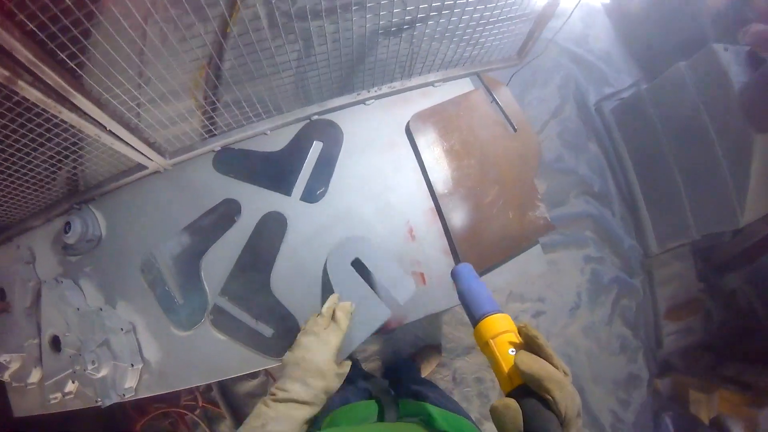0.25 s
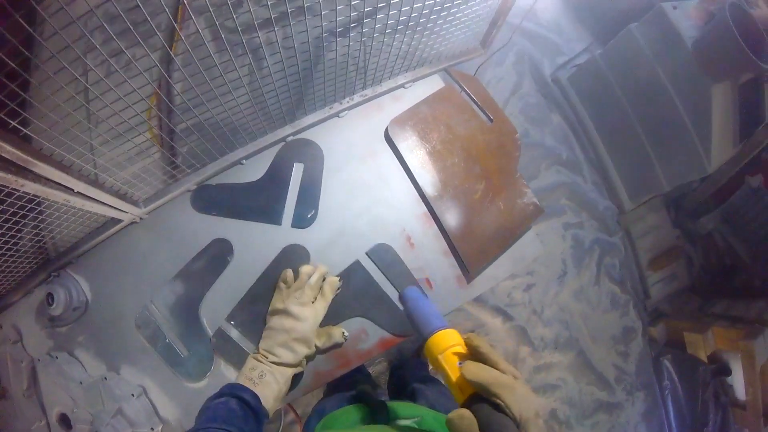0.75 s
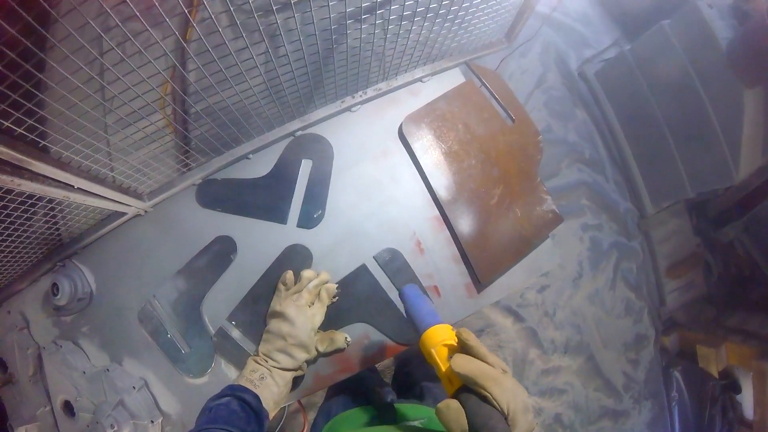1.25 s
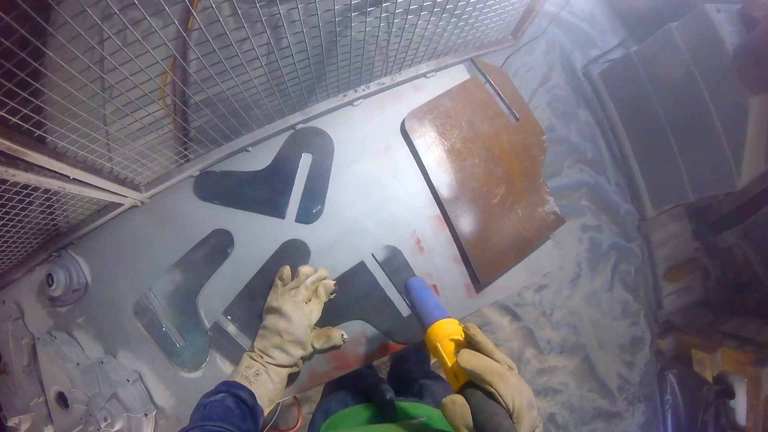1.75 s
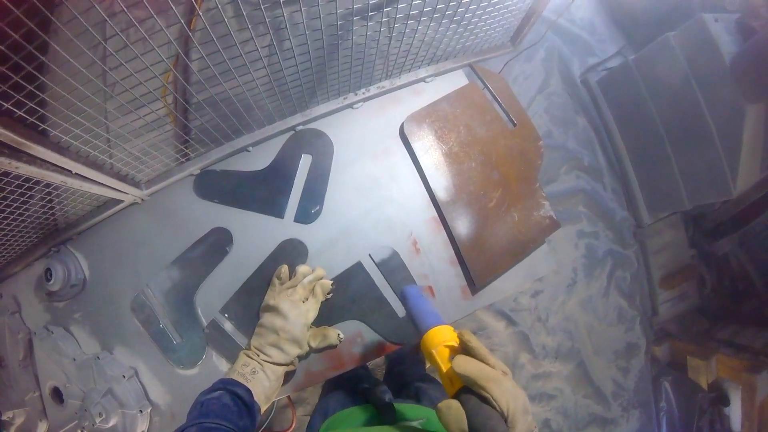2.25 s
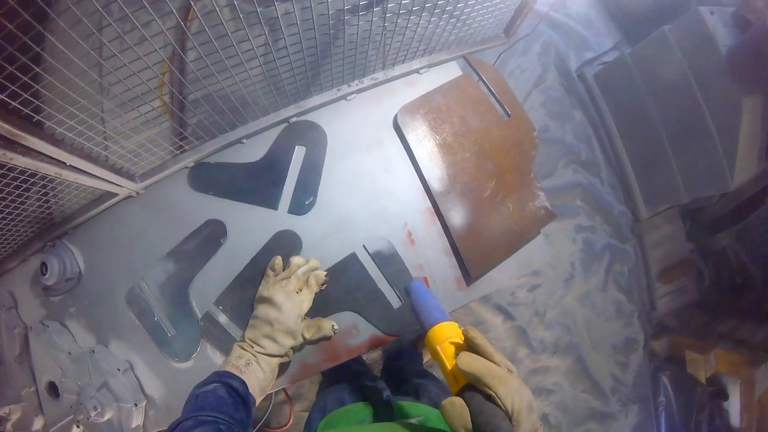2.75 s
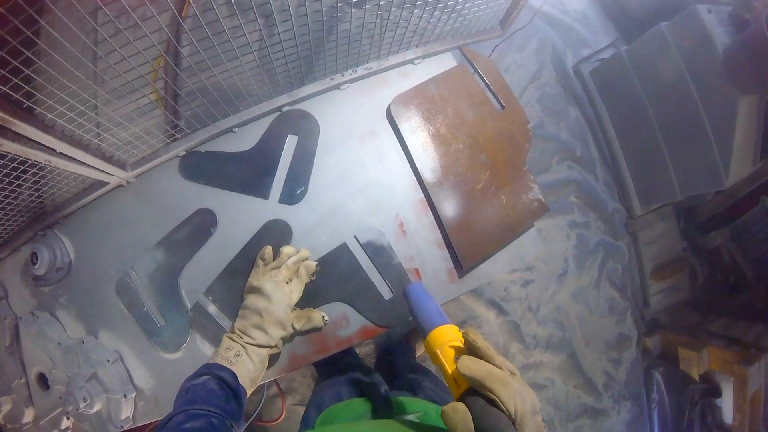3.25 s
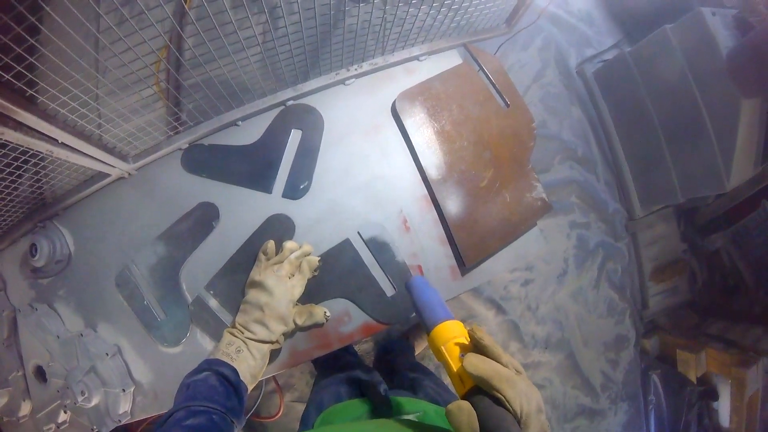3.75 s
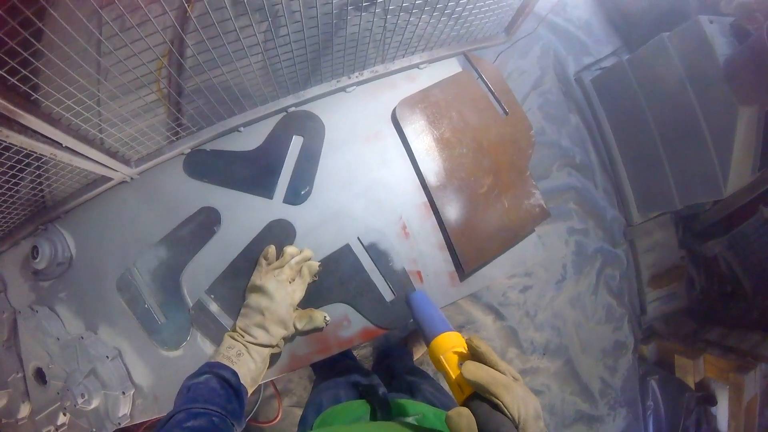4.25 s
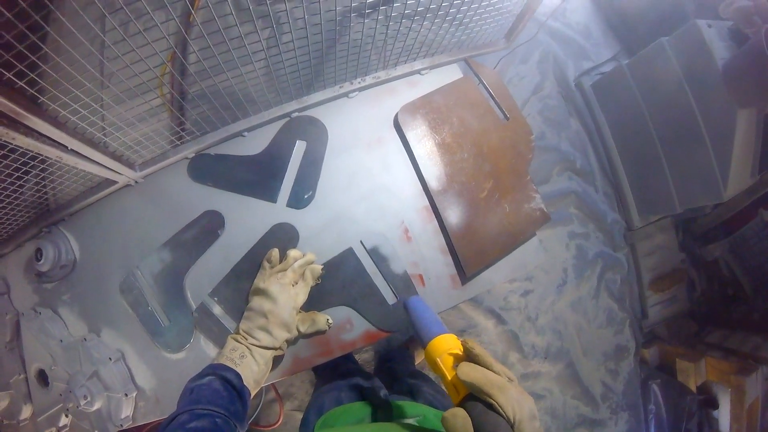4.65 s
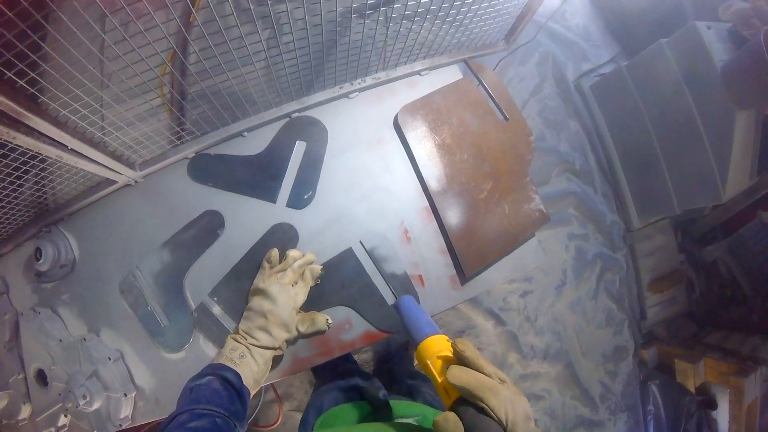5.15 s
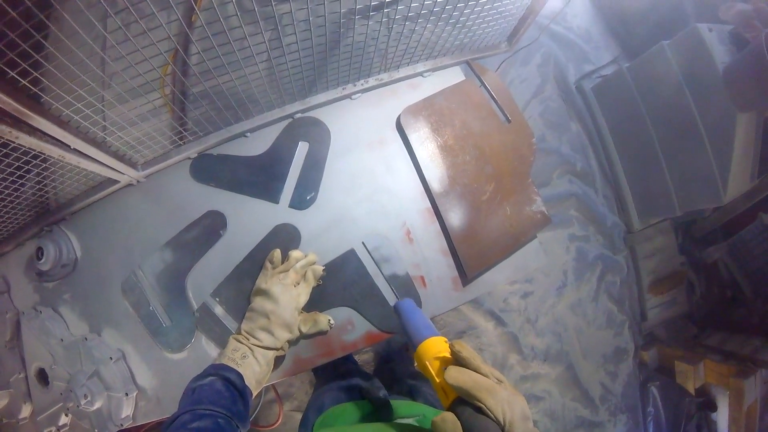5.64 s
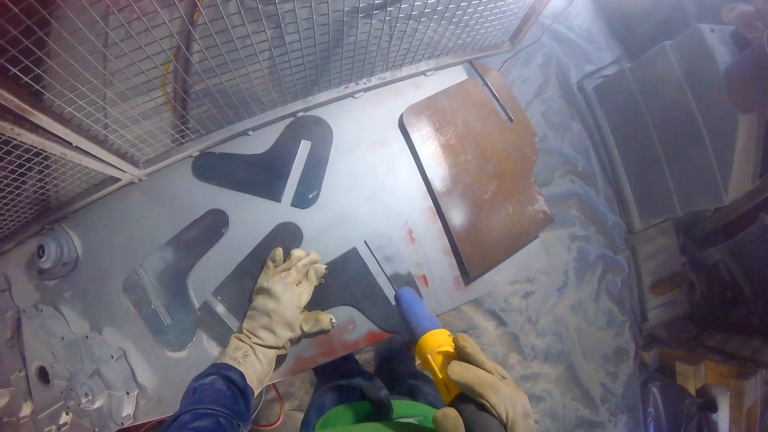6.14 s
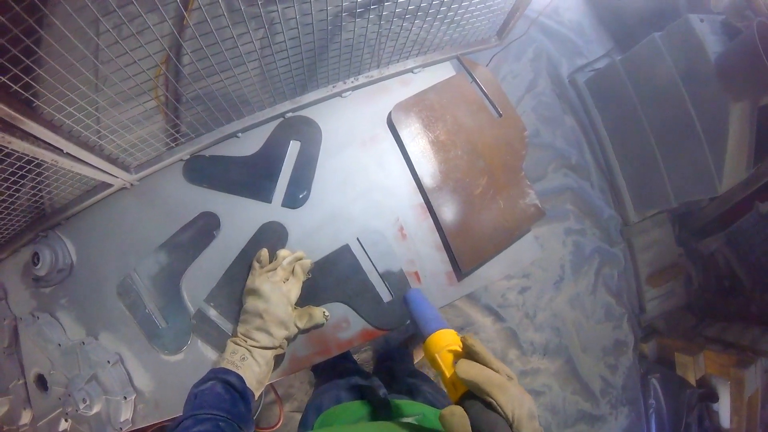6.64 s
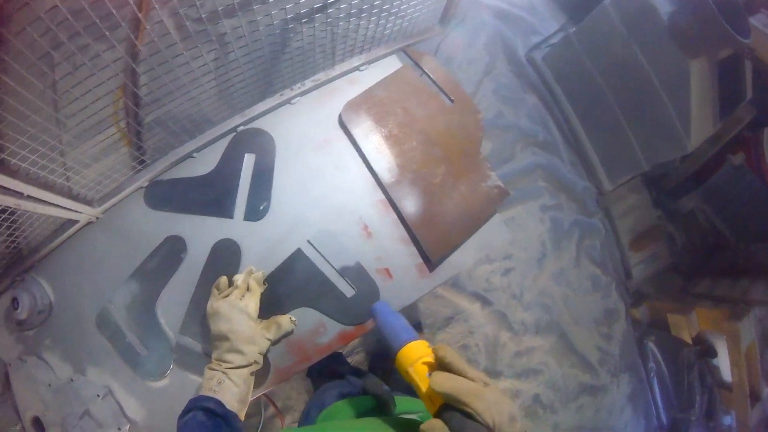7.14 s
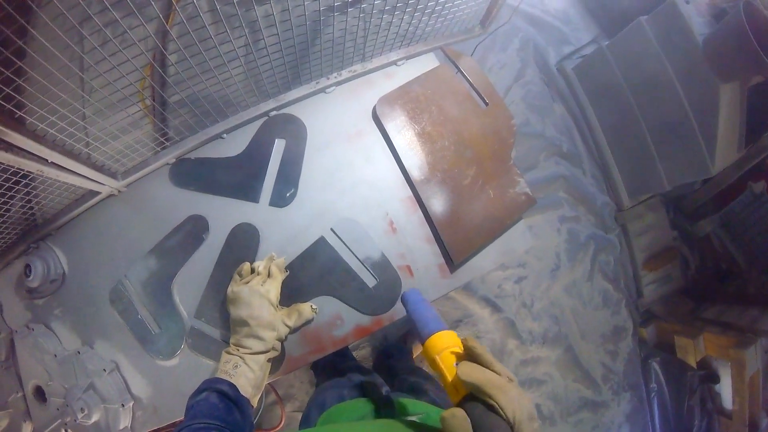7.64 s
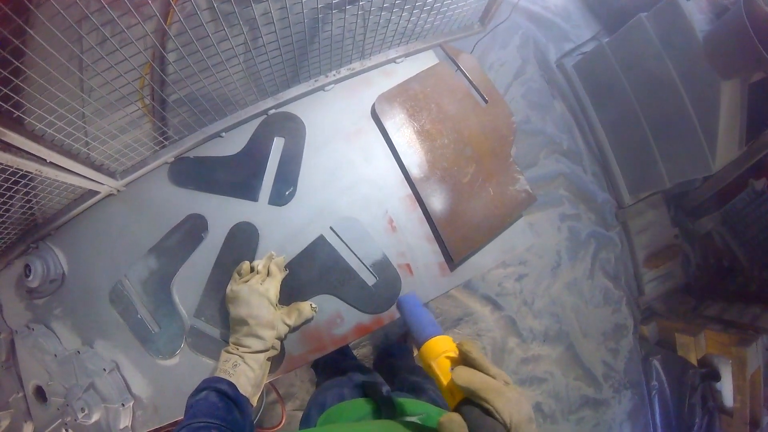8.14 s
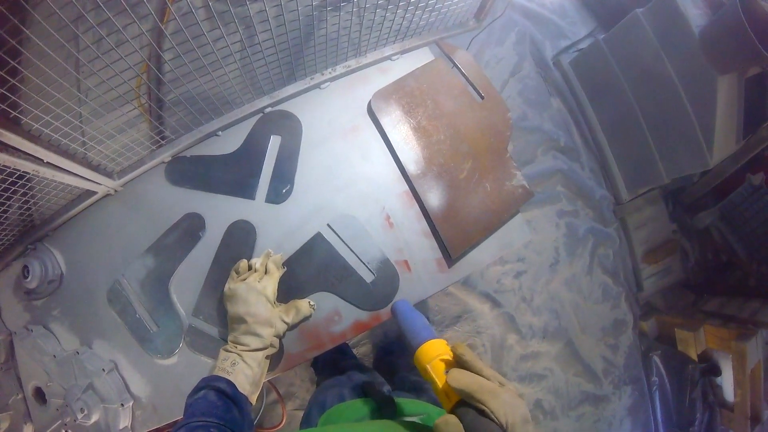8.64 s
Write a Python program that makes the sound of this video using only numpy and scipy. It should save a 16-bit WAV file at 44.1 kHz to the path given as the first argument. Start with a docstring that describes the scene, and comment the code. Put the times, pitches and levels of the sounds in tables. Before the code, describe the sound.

A sandblasting nozzle sprays air and grit onto flat steel parts with a loud, continuous hiss and roar. In the first second a part scrapes softly on the bench as it is turned over, and deflected air buffets the close microphone. The hiss carries on, fluttering slightly, with a few faint, fuzzy whistles and tiny ticks of stray grit. An extractor motor hums low behind it in the small booth.

```python
"""Sandblasting nozzle playing air and grit on flat steel parts in a small booth.
The turbulent jet hisses, flutters, roars on the plate and whistles across a slot; stray grains tick.
Early on a part is shoved and turned over, and deflected air buffets the microphone.
An extractor motor hums behind. Jet and ticks ring in several bands of the booth and a closed camera case."""
import sys
import numpy as np
from scipy import signal
from scipy.fft import rfft, irfft, next_fast_len
from scipy.io import wavfile
from scipy.ndimage import uniform_filter1d

SR = 44100
rng = np.random.default_rng(int(sys.argv[2]) if len(sys.argv) > 2 else 0)


def transcribe(signal):
    """Save signal, clipped to [-1, 1], as a 16-bit WAV file at the path in sys.argv[1]."""
    frames = np.atleast_2d(signal).T
    limited = np.clip(frames, -1, 1)
    pcm = np.round(limited * 32767).astype(np.int16)
    wavfile.write(sys.argv[1], SR, pcm)


N = 392049
HOP = 256
TIME_S = np.arange(N) / SR

# hand-guided jet, levels used about their means: t/s, hiss/dB, grit sizzle/dB, air roar/dB, spray/dB
AIM_CURVES = [(0.0, -16.5, -10, -10, -36.5), (0.25, -20.0, -4.5, -8.0, -39), (0.68, -18.5, -3.5, -8, -37),
              (0.78, -18.0, 3, -7.5, -30.5), (1.05, -19.0, -0.5, -4.5, -33),
              (1.5, -18.0, -1.5, -5.5, -32.5), (2.5, -19.5, -1, -3, -34), (3.4, -18, 0, -5.0, -39),
              (4.1, -19.5, 1.5, -4.5, -34.5), (4.6, -18.5, 2, -5.5, -35), (5.6, -19.5, 1.5, -6, -35),
              (6.2, -19.5, 3, -6, -34.5), (6.8, -19.5, 1.5, -6.5, -34), (7.07, -17.5, -1, -7.5, -35),
              (7.3, -20.5, -2.5, -6.5, -35), (7.9, -18.5, 0.5, -5.5, -33.5), (8.4, -19.5, 0.5, -4.0, -37),
              (8.88, -19.0, 0.5, -3.5, -34.0)]
# jet slipping off the steel: t/s, sizzle loss/dB
AIM_SLIPS = [(1.73, 5), (2.04, 2), (2.32, 3), (2.73, 3.5), (6.53, 3.5), (7.69, 3.5), (8.17, 2)]
# smooth jet spectrum: f/Hz, relative density/dB
JET_SPECTRUM = [(60, -35), (180, -14), (400, 0), (1000, 0), (2100, -7), (3700, -6.5), (6000, -8),
                (7500, -4.5), (8700, -11), (10400, -28.5), (11700, -40), (12900, -39), (13500, -67)]
# jet flutter: f/Hz, rms depth/dB
JET_FLUTTER = [(300, 1.5), (900, 1.3), (2000, 1.23), (3000, 1), (4300, 1.5), (6800, 1.5), (9000, 1.4),
               (12000, 3)]
# booth and bench resonances and nulls: f/Hz, half width/Hz, gain/dB
BOOTH_BANDS = [(200, 12, 8), (272.4, 9.8, 5), (316, 13.4, -4), (351.5, 12, 1.5), (393, 9.4, 1.5),
               (470, 11, 4), (495, 12, -2.5), (535, 12, 3), (580, 18, -1.5), (632, 10, 2), (664, 8.8, -3.5),
               (710.5, 11.3, 6.5), (797, 16, 5), (849, 8.8, -2), (875, 64, 5.5), (974, 6.5, 6),
               (1058, 8.8, 4.5), (1190, 14, 0), (1272, 9, 4.5), (1282, 14.4, -12.5), (1325, 12.6, 8.5),
               (1333, 10, -4), (1447, 27, 3), (1520, 12, -2.5), (1700, 66, 3)]
# camera case resonances and nulls: f/Hz, half width/Hz, gain/dB
CASE_BANDS = [(1400, 50, -1.5), (2030, 52, -1.5), (2821, 223, 10), (3360, 146, 5.5), (3680, 50, 0),
              (4154, 197, 11.5), (4500, 25, -14), (4698, 187, 13), (5036, 150, 9), (5587, 230, 5),
              (5930, 60, -1.5), (6504, 194, 9.5), (7010, 355, 11.4), (8177, 110, -26), (8310, 89, -18),
              (10000, 39, -10)]
# wall reflections: delay/s, gain/dB
WALL_ECHOES = [(0.011, -14.5), (.0152, -30), (.027, -19), (.041, -20.5)]
# jet crossing the slot: t/s, level/dB, half length/s
SLOT_CROSSINGS = [(.86, -26.5, 0.056), (1.33, -28, 0.1), (1.85, -30, .25), (2.33, -31, .06),
                  (2.48, -25, 0.046), (2.8, -25, .06), (8.043, -21, .025)]
# spilling air: f/Hz, relative density/dB
DRAUGHT_SPECTRUM = [(20, -30), (55, -2), (85, 3.5), (105, -17), (125, 5.5), (160, -3), (215, -3), (300, 0),
                    (500, -5.5), (1200, -61)]
# air thrown off the part: t/s, level/dB, half length/s, upper edge/Hz
GUST_EVENTS = [(0.158, -31, 0.013, 160), (0.448, -23, 0.019, 129), (.485, -27.5, 0.024, 477),
               (.505, -31, .01, 140), (0.584, -23.5, 0.027, 500), (0.702, -29, .014, 170),
               (3.62, -38, .04, 190.7)]
# modes of the part on the bench: f/Hz, width/Hz, gain/dB
PLATE_MODES = [(230, 44, -15), (358, 53, -3.5), (410, 35, -7), (477.6, 15, 5.5)]
# part sliding on the bench: t/s, level/dB, half length/s
PLATE_SHOVES = [(0.185, -33, .035), (0.443, -32, .04), (0.587, -26, 0.025), (0.777, -28, .03),
                (0.886, -31, .02), (0.97, -28, 0.042)]
# motor tones: f/Hz, rms level/dB
MOTOR_TONES = [(64.6, -46), (124, -57.5)]
# extractor air: f/Hz, relative density/dB
DUCT_SPECTRUM = [(10, -20), (30, -7), (47, 10), (57, -5), (80, 5), (110, 3), (200, -32.5)]


def jet(level_db=-18.5, surge_db=0.25, wander_db=1.55):
    """Turbulent hiss: aim sets roar, sizzle and spray; eddies flutter each band on its own."""
    t = np.arange(N // HOP + 8) * HOP / SR
    hz = np.fft.rfftfreq(4 * HOP, 1 / SR)
    hiss_db, sizzle_db, roar_db, spray_db = aim(t)
    field_db = hiss_db + sizzle_db * above(hz, 6300, order=16)
    field_db += roar_db * (1 - above(hz, 2560)) * above(hz, 590)
    field_db += (spray_db - field_db) * above(hz, 7300, order=24)  # rebounding spray takes the top
    shape = field_db.shape
    field_db += log_interp(JET_FLUTTER, hz) * eddies(shape, slow_hz=4.8, fast_hz=22, span_hz=437)
    # uneven grit feed surges all bands together
    field_db += surge_db * eddies(shape, slow_hz=6.3, fast_hz=40, span_hz=6000)
    # narrow peaks and hollows wander as the nozzle moves
    wander = eddies(shape, slow_hz=0.27, fast_hz=2.97, span_hz=69)
    field_db += wander_db * above(hz, 1120, order=4) * wander
    noise = rng.standard_normal(shape) + 1j * rng.standard_normal(shape)
    _, air = signal.istft((noise * amp(field_db)).T, nperseg=4 * HOP, noverlap=3 * HOP)
    return amp(level_db) * unit_rms(filtered(unit_rms(air[:N]), jet_colour))


def aim(t, slip_half_s=0.045):
    """Hiss, sizzle, roar, spray in dB about their means: slow guiding, brief slips, wrist waggle."""
    hiss_db, sizzle_db, roar_db, spray_db = curves_at(AIM_CURVES, t)
    slip_db = sum(db * bell(t, at_s, slip_half_s) for at_s, db in AIM_SLIPS)
    wrist = waggle(t)
    levels_db = hiss_db, sizzle_db - slip_db, roar_db + 0.2 * wrist, spray_db - 0.7 * slip_db - 1.5 * wrist
    return [db[:, None] - db.mean() for db in levels_db]


def waggle(t, rate_hz=6.6, unsteadiness=0.39):
    """Wrist rocking the nozzle at an uneven pace."""
    pace = 1 + unsteadiness * unit_rms(uniform_filter1d(rng.standard_normal(len(t)), size=24))
    return np.sin(2 * np.pi * (rng.random() + np.cumsum(rate_hz * pace) * (t[1] - t[0])))


def eddies(shape, slow_hz, fast_hz, span_hz):
    """Random frame-by-bin field fluttering between two rates, alike across span_hz."""
    rate_hz = abs(np.fft.fftfreq(shape[0], HOP / SR))[:, None]
    lag_s = np.fft.rfftfreq(shape[1], SR / 2 / (shape[1] - 1))
    rate_band = above(rate_hz, slow_hz) * (1 - above(rate_hz, fast_hz, order=4))
    weight = rate_band * np.exp(-0.5 * (np.pi * lag_s * span_hz) ** 2)
    return unit_rms(np.fft.irfft2(np.fft.rfft2(rng.standard_normal(shape)) * weight, shape))


def jet_colour(hz):
    """Amplitude spectrum of the jet through booth and case."""
    bands_db = sum(db * bell(hz, centre_hz, half_hz) for centre_hz, half_hz, db in BOOTH_BANDS + CASE_BANDS)
    return amp(log_interp(JET_SPECTRUM, hz) + bands_db)


def walls(x, edge_hz=1500):
    """Near walls return the treble: a faint hollow comb."""
    treble = filtered(x, lambda hz: above(hz, edge_hz, order=4))
    return x + sum(amp(db) * np.interp(TIME_S - delay_s, TIME_S, treble, left=0)
                   for delay_s, db in WALL_ECHOES)


def slot_whistle(centre_hz=4745, width_hz=130, flutter_db=2.5):
    """Fuzzy whistle as the jet crosses the slot in the part."""
    flutter = amp(-flutter_db * drift(knots=220))
    whistle = shaped_noise(lambda hz: 1 / (1 + ((hz - centre_hz) / width_hz) ** 2) ** 2)
    return swells(SLOT_CROSSINGS) * flutter * whistle


def ricochets(level_db=-38, rate_per_s=70, spread_db=4, edge_hz=4000):
    """Single grains fly back and tick on the case."""
    sizes = amp(spread_db * np.minimum(rng.exponential(1, N), 4))
    clicks = sizes * rng.choice([-1, 1], N) * (rng.random(N) < rate_per_s / SR)
    ticks = filtered(clicks, lambda hz: jet_colour(hz) * above(hz, edge_hz, order=2))
    return amp(level_db) * unit_rms(ticks)


def draught(level_db=-44, turn_db=-32, turn_s=0.47, turn_half_s=0.22):
    """Spent air rumbles on the microphone with the jet's force; swells as the turned part deflects it."""
    rumble = shaped_noise(lambda hz: amp(log_interp(DRAUGHT_SPECTRUM, hz)))
    hiss_db, _, roar_db, _ = curves_at(AIM_CURVES, TIME_S)
    push_db = 3.1 * hiss_db + 1.4 * roar_db
    spill = amp(level_db + push_db - push_db.mean())
    deflected = amp(turn_db) * bell(TIME_S, turn_s, turn_half_s)
    return (spill + deflected) * rumble


def gusts(low_hz=70):
    """Short low buffets as the jet glances off a part towards the microphone."""
    out = np.zeros(N)
    for at_s, db, half_s, top_hz in GUST_EVENTS:
        near = abs(TIME_S - at_s) < 0.2
        envelope = bell(TIME_S[near], at_s, half_s)
        air = filtered(rng.standard_normal(SR), lambda hz: above(hz, low_hz) * (1 - above(hz, top_hz)))
        puff = envelope * air[:len(envelope)]
        out[near] += amp(db) * puff * np.linalg.norm(envelope) / np.linalg.norm(puff)
    return out


def plate_drag():
    """Grit under the sliding part rubs its low modes at each shove."""
    def modes(hz):
        return abs(sum(amp(db) / (1 + 2j * (hz - mode_hz) / width_hz) ** 2
                       for mode_hz, width_hz, db in PLATE_MODES))
    return swells(PLATE_SHOVES) * shaped_noise(modes)


def extractor(waver_db=1.0, drift_rad=0.4, duct_db=-47):
    """Wavering motor hum over the rumble of its air."""
    out = amp(duct_db) * shaped_noise(lambda hz: amp(log_interp(DUCT_SPECTRUM, hz)))
    for hz, db in MOTOR_TONES:
        peak = np.sqrt(2) * amp(db + waver_db * drift(knots=40))
        out += peak * np.sin(2 * np.pi * hz * TIME_S + drift_rad * drift(knots=40))
    return out


def amp(db):
    """dB to amplitude."""
    return 10 ** (np.asarray(db) / 20)


def unit_rms(x):
    """Scale to rms 1."""
    return x / np.sqrt(np.mean(x ** 2) + 1e-20)


def log_interp(rows, hz):
    """Table value at hz, on a log-frequency axis."""
    row_hz, values = np.transpose(rows)
    return np.interp(np.log(hz + 1), np.log(row_hz + 1), values)


def curves_at(rows, t):
    """Each curve of a table at times t."""
    row_s, *columns = np.transpose(rows)
    return [np.interp(t, row_s, column) for column in columns]


def bell(x, centre, half_width):
    """Gaussian, peak 1, sigma half_width."""
    return np.exp(-0.5 * ((x - centre) / half_width) ** 2)


def swells(rows):
    """Envelope with one bell per event."""
    return sum(amp(db) * bell(TIME_S, at_s, half_s) for at_s, db, half_s in rows)


def drift(knots):
    """Random line through evenly spaced knots."""
    return np.interp(TIME_S, np.linspace(0, TIME_S[-1], knots), rng.standard_normal(knots))


def above(hz, edge_hz, order=8):
    """Soft step from 0 to 1 at edge_hz."""
    return 1 - 1 / (1 + (hz / edge_hz) ** order)


def filtered(x, gain):
    """Zero-phase filter by gain(hz)."""
    size = next_fast_len(len(x) + 4096)
    grid_hz = np.linspace(0, SR / 2, 8193)
    response = np.interp(np.fft.rfftfreq(size, 1 / SR), grid_hz, gain(grid_hz))
    return irfft(rfft(x, size) * response, size)[:len(x)]


def shaped_noise(gain):
    """Noise shaped by gain(hz), rms 1."""
    return unit_rms(filtered(rng.standard_normal(N), gain))


def scene():
    """Mono mix: jet, whistle, grit, moving air, sliding part, extractor."""
    return (walls(jet()) + slot_whistle() + ricochets() + draught() + gusts() + plate_drag()
            + extractor())[None]


def record(dry):
    """Steep low-pass at 13.7 kHz."""
    taps = signal.firwin(511, 13700, window=("kaiser", 9), fs=SR)
    return signal.oaconvolve(dry, taps[None], "same")


dry = scene()
out = record(dry)
transcribe(out)
```